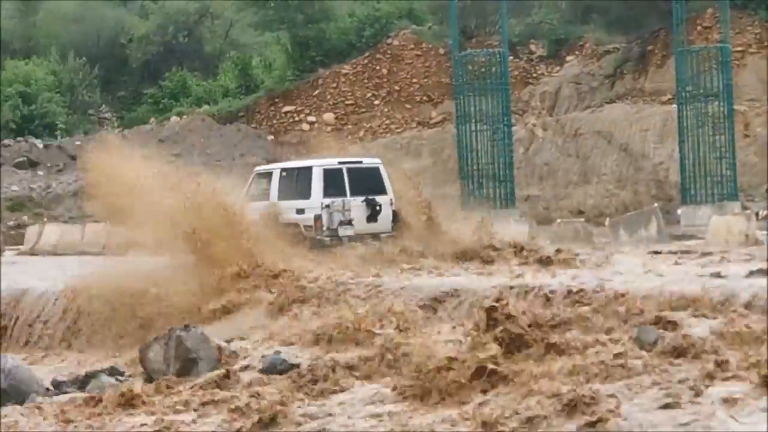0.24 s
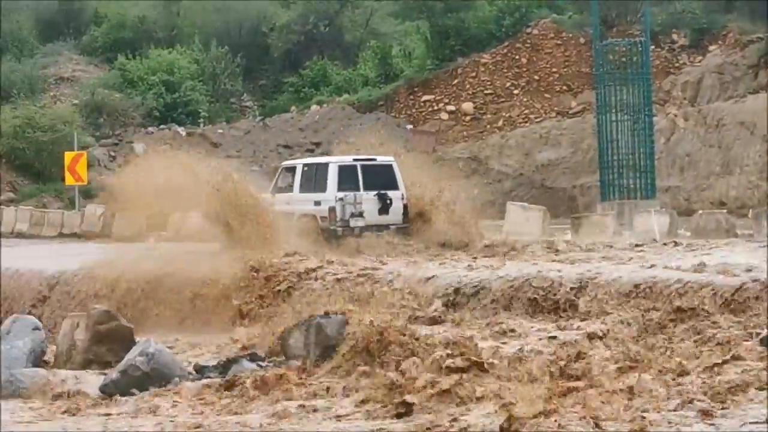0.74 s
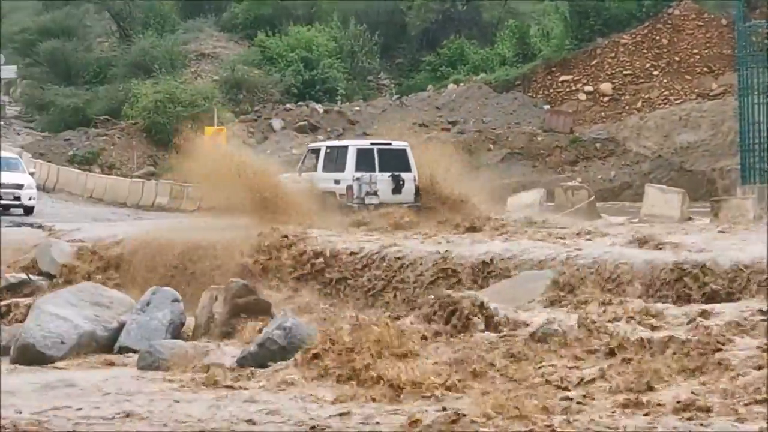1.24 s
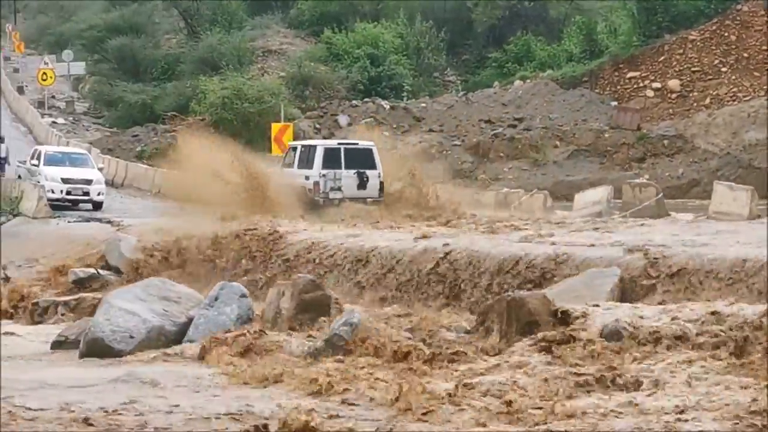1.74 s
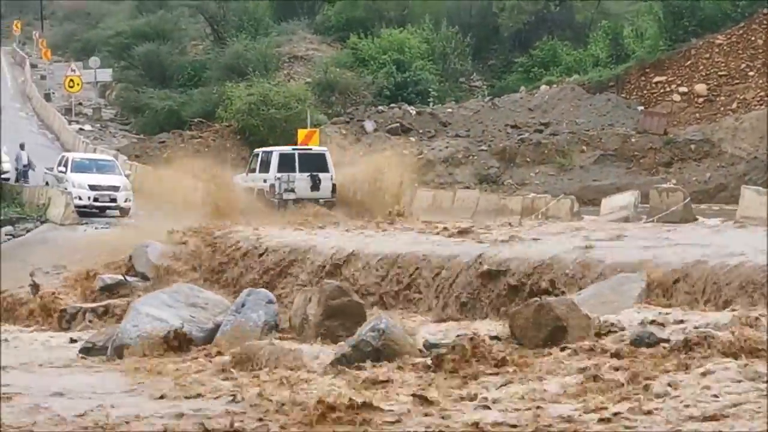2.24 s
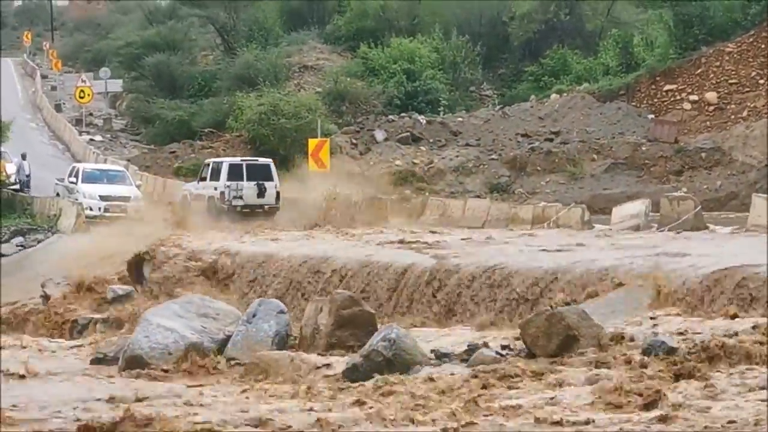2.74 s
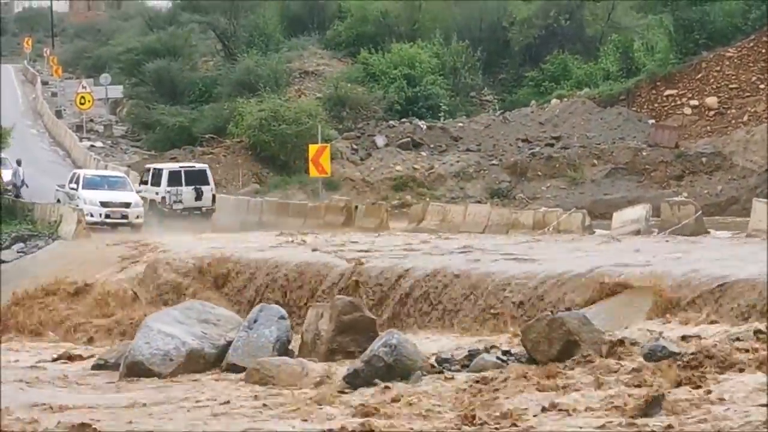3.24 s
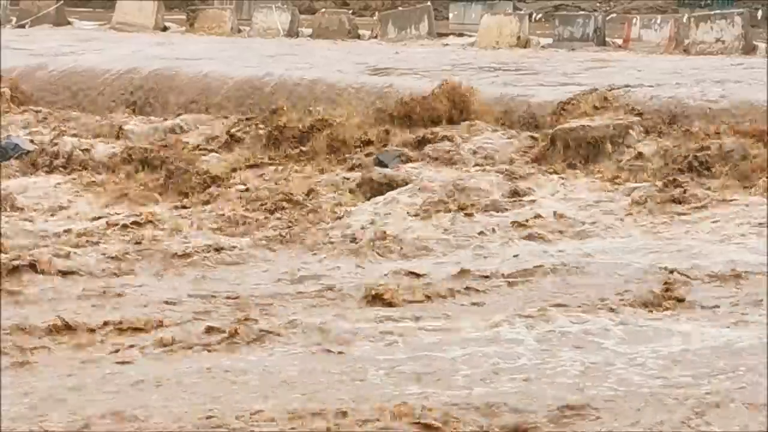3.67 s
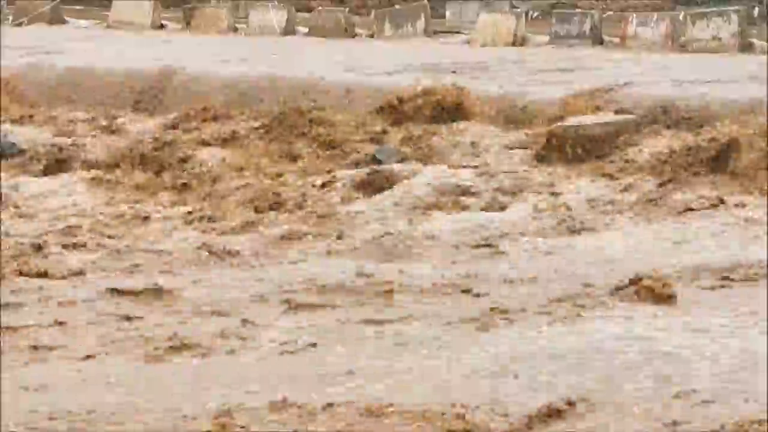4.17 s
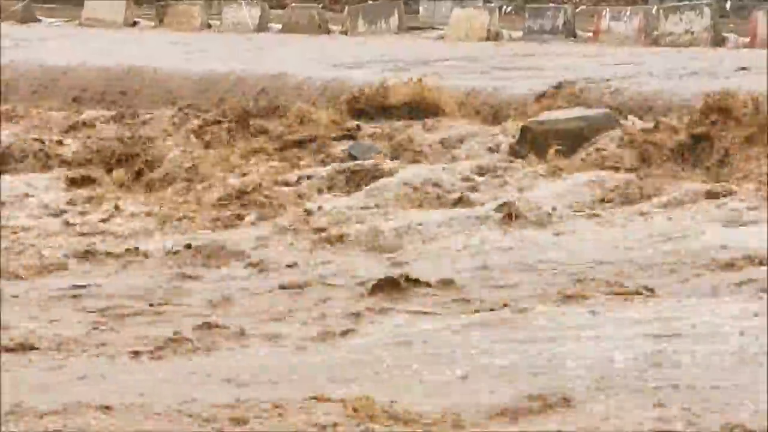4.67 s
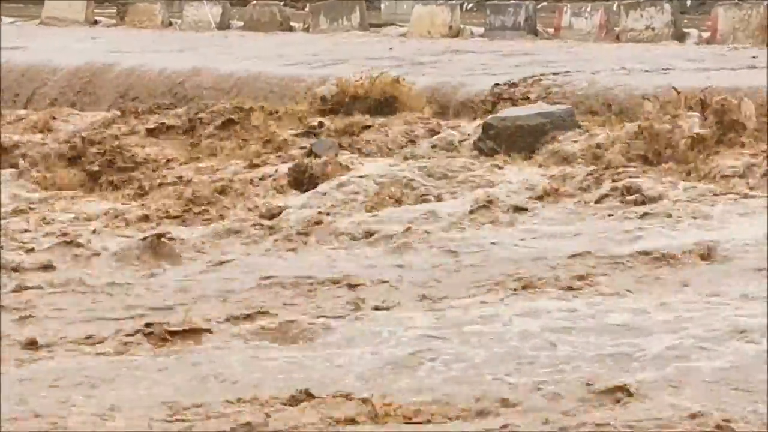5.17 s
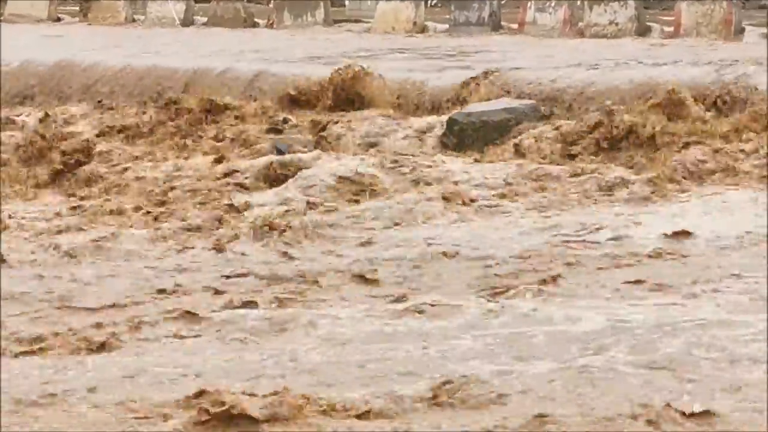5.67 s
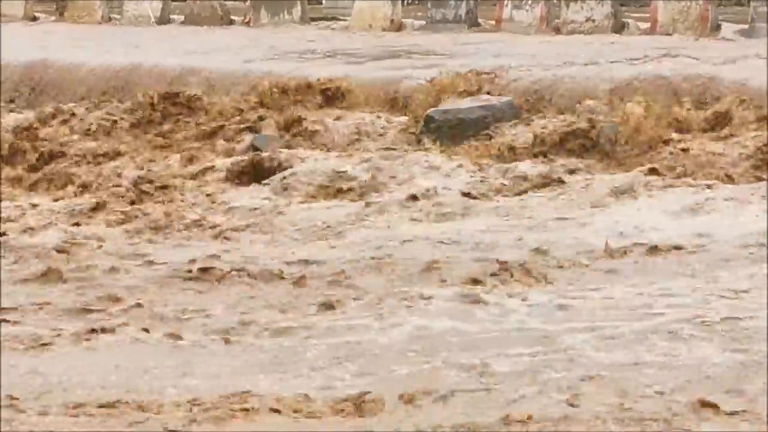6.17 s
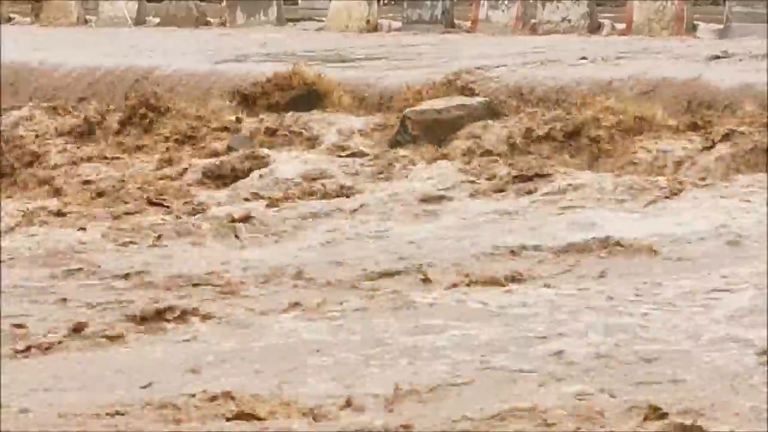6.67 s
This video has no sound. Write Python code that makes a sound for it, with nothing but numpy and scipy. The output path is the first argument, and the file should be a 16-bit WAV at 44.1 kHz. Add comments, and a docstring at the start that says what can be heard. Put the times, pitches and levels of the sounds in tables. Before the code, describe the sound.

From the start, a muddy torrent rushes steadily over a flooded road and boulders: low rumbling air pockets, a thick mid-range roar and constant bright hissing foam and spray. A car pushing through the water strengthens the rumble, easing from about 1.2 s and gone by 3.3 s; no separate engine stands out. Soft low gulps occur near 0.5, 1.1, 1.6 and 2.3 s, with tiny bright drop ticks around 1.9 and 2.5 s. At 3.5 s the sound drops abruptly to near silence, returning suddenly at 3.8 s with a changed tone, facing down at the water. Waves swell gently around 4.5, 5.4 and 6.2 s as rumble slowly builds. A low double gulp comes at 4.3 s, a sharp high spit at 4.8 s, another gulp at 5.6 s. Wide stereo, some distance away; the dull left side becomes quieter after 4.4 s. The flow continues to the end.

```python
"""At a flooded road crossing, muddy water pours over the road and churns between boulders, some way off.
Big trapped air pockets rumble, breaking waves roar, and foam and spray hiss with countless small bubbles.
Seven low gulps and a few near drops stand out; a car fords the water, lifting the rumble, and draws away.
The left microphone port is dull and gets more shaded late on. The sound drops out briefly midway
and returns in another tone, with the microphones pointing down at the water."""
import sys
import numpy as np
from scipy import signal
from scipy.fft import rfft, irfft, next_fast_len
from scipy.io import wavfile
from scipy.ndimage import uniform_filter1d, map_coordinates

SR = 44100
rng = np.random.default_rng(int(sys.argv[2]) if len(sys.argv) > 2 else 0)


def output_pcm(signal):
    """Save a mono or channel-first signal as 16-bit PCM at the path in sys.argv[1].

    Samples are clipped to [-1, 1] before scaling.
    """
    pcm = np.clip(np.atleast_2d(signal).T, -1, 1) * 32767
    wavfile.write(sys.argv[1], SR, np.round(pcm).astype(np.int16))


N = 304731
TIME = np.arange(N) / SR  # s

# relative spectrum of the large air pockets: (frequency [Hz], level [dB])
RUMBLE_SPECTRUM = [(12, -26), (20, -12), (30, -10), (45, -4), (65, -1.5), (120, -1.5), (205, 0.5),
                   (330, -1.25), (420, -8.5), (600, -23), (1200, -62)]
# relative spectrum of the breaking waves: (frequency [Hz], level [dB])
ROAR_SPECTRUM = [(200, -31.5), (380, -7.5), (470, -3.5), (600, -0.3), (730, -0.5), (840, -3), (950, -8.5),
                 (1300, -14.5), (2000, -23.5), (5000, -51)]
# waves that swell over the boulders: (time of crest [s], roar boost [dB])
SURGE_CRESTS = [(1.7, 0.5), (2.7, .5), (3.9, 0.7), (4.45, 1.4), (5.4, 1.5), (6.2, 1.1)]
# relative spectrum of the seething foam: (frequency [Hz], level [dB])
FOAM_SPECTRUM = [(400, -29.5), (900, 0.5), (1400, -2.5), (2300, -0.5), (5500, 1), (7500, -1.5),
                 (9000, -8.5), (14000, -36)]
# relative spectrum of the finest spray: (frequency [Hz], level [dB])
MIST_SPECTRUM = [(4000, -32), (7000, -9), (8500, 0), (11000, -0.5), (16000, 0)]
# extra level of the spray at the start: (time [s], level [dB])
MIST_BOOST = [(0, 2.5), (.4, 1.8), (.72, 2.6), (1, 1.4), (1.6, 0)]
# heavy gulps of trapped air: (onset [s], level [dB], starting pitch [Hz])
GULP_EVENTS = [(.549, -26, 180), (1.129, -30, 315), (1.55, -25, 170), (2.274, -22, 211), (4.28, -22.5, 248),
               (4.3, -24, 205), (5.57, -28, 125)]
# near drops: (onset [s], pitch [Hz], level [dB], 60 dB decay time [s])
DROP_EVENTS = [(1.8785, 5250, -18, .012), (1.887, 5600, -22, .022), (2.512, 15000, -18, .008),
               (4.7893, 10500, -13, .003), (4.7894, 12400, -9, 0.0033), (4.7896, 14900, -6, .003),
               (4.7898, 6400, -14, .004)]
# left-right likeness of roar and foam: (frequency [Hz], likeness [0-1])
LIKENESS = [(300, 0.78), (450, 0.56), (700, 0.73), (850, 0.28), (1000, 0.08), (1600, 0), (3000, 0.02),
            (7000, 0.2)]
# delay of the foam at the left port as the microphones swing: (time [s], delay [samples])
LEFT_LAG = [(0, -12), (.9, -11), (1.5, 0), (2.7, 10), (3.5, 0), (3.75, -14), (6.9, -14)]
# tone of rumble and roar with the microphones pointing down: (frequency [Hz], gain [dB])
FACING_WATER_TONE = [(30, -2), (60, 0), (100, -3.2), (150, 1.2), (240, -0.7), (330, -1.2), (420, 0.2),
                     (530, 1.7), (630, 1.2), (760, -1.4), (900, -3.5), (1100, -0.7), (1400, 1.2), (3000, 6)]
# colour of the left microphone port: (frequency [Hz], gain [dB])
LEFT_PORT_TONE = [(50, 2.5), (280, -0.06), (460, -3), (750, -6), (1200, -4), (1900, -7), (3000, -9.5),
                  (4400, -10.5), (6000, -13.5), (7100, -9), (8500, -18), (10000, -19), (14600, -20.5),
                  (15600, -28)]
# colour of the right microphone port: (frequency [Hz], gain [dB])
RIGHT_PORT_TONE = [(1300, 0), (3000, -1), (4300, .3), (4800, -.5), (6200, 1.4), (6750, 6), (7650, -5.5),
                   (10150, -5), (10650, 1.3), (11700, -2), (13400, -2.7), (13950, -8.8), (14700, -6),
                   (15700, -7.3)]
# small resonances and dips of the right port: (centre [Hz], width [Hz], gain [dB])
RIGHT_PORT_RIPPLE = [(1870, 130, -1.1), (2234, 250, 2.5), (2630, 140, 1), (2950, 120, 2.1),
                     (4100, 150, 0.8), (7860, 220, 1), (8700, 200, -2.5)]
# extra shading of the left port: (frequency [Hz], gain [dB])
LEFT_SHADE_TONE = [(100, -4), (600, -5), (3000, -4), (10000, -5)]

# base levels of the flood's layers (dB)
RUMBLE_DB, ROAR_DB, FOAM_DB, MIST_DB = -35.5, -35, -33, -31
# level changes with the microphones pointing down (dB)
ROAR_DOWN_DB, FOAM_DOWN_DB, MIST_DOWN_DB = -0.23, -0.66, 1
# the rumble is then offset, and builds slowly from the end of the gap
RUMBLE_DOWN_DB, RUMBLE_GROWS_DB_PER_S = -0.5, 0.43
# random heaving of the water: rms depth (dB) and pace (random points per s)
HEAVE_RUMBLE_DB, HEAVE_ROAR_DB, HEAVE_BRIGHT_DB, HEAVE_RATE = .5, .55, 0.08, 10
SURGE_S = 0.29  # time from a wave's crest until its boost falls to 1/e
# the car's share of the rumble (dB), when it starts to fade and when it is gone (s)
WAKE_DB, WAKE_FADES_S, WAKE_GONE_S = 2, 1.2, 3.3
DROP_ATTACK_S = .0003
SHADE_FROM_S, SHADE_TO_S = 4.28, 4.48
GAP_FROM_S, GAP_TO_S = 3.496, 3.7755
TOP_HZ = 15800  # upper end of the band


def amp(db):
    """Turn decibels into gain."""
    return 10 ** (np.asarray(db) / 20)


def unit(x):
    """Scale to rms 1."""
    return x / np.sqrt(np.mean(x ** 2) + 1e-20)


def along(points, hz):
    """Read (frequency, value) points on a log frequency axis."""
    f, v = np.transpose(points)
    return np.interp(np.log(hz + 1), np.log(f + 1), v)


def curve(points):
    """Draw (time, value) points as one value per sample."""
    s, v = np.transpose(points)
    return np.interp(TIME, s, v)


def wobble(rate):
    """Draw a smooth random curve of rms 1 through `rate` random points a second."""
    knots = rng.standard_normal(int(N * rate / SR) + 4)
    return unit(map_coordinates(knots, [TIME * rate]))


def filtered(x, response):
    """Multiply the spectrum of x by a response of frequency."""
    m = next_fast_len(N + SR // 2)
    hz = np.fft.rfftfreq(m, 1 / SR)
    return irfft(rfft(x, m) * response(hz), m)[..., :N]


def coloured(x, spectrum):
    """Shape x by (frequency, dB) points."""
    return filtered(x, lambda hz: amp(along(spectrum, hz)))


def churn(patchy_db):
    """Two unrelated noises, patchy in time and pitch alike: bubbles too many to tell apart."""
    z = signal.stft(rng.standard_normal((2, N)), nperseg=512)[2]
    patches = uniform_filter1d(rng.standard_normal(z.shape[1:]), size=12, axis=0)  # across pitch
    patches = uniform_filter1d(patches, size=8, axis=1)  # across time
    noise = signal.istft(z * amp(patchy_db * unit(patches)), nperseg=512)[1]
    return unit(noise[:, :N])


def bubbles(rate, low_hz, high_hz, cycles, scatter_db, size):
    """Random bubbles (rate per s), each ringing for a few cycles and rising in pitch near the surface."""
    when, pitch, strength = rng.random((int(rate * N / SR), 3)).T
    hz = low_hz + (high_hz - low_hz) * pitch
    turns = hz[:, None] * np.arange(size) / SR
    age = np.minimum(turns / cycles, 2)
    gain = amp(-scatter_db * np.log(1 - .995 * strength)) * np.sqrt(hz)  # a few are far louder
    tones = np.sin(2 * np.pi * turns * (1 + age / 20))
    rings = gain[:, None] * np.exp(-np.pi * age) * tones
    at = (when * N).astype(int)[:, None] + np.arange(size)
    return unit(np.bincount(at.ravel(), rings.ravel(), N)[:N])


def bubble_pair(**settings):
    """Two unrelated streams of bubbles."""
    return np.array([bubbles(**settings) for _ in range(2)])


def spread(pair, likeness):
    """Mix two unrelated signals into left and right of a given likeness per frequency."""
    def mid_side_gains(hz):
        turn = np.arccos(np.clip(likeness(hz), -1, 1)) / 2
        return np.array([np.cos(turn), np.sin(turn)])

    mid, side = filtered(pair, mid_side_gains)
    return np.array([mid + side, mid - side])


def rumble():
    """Large air pockets gulp under the fall; waves this long reach both ports much alike."""
    pockets = bubbles(rate=70, low_hz=71.0, high_hz=406, cycles=6.0, scatter_db=1.5, size=3000)
    mass = spread(churn(patchy_db=0.68), lambda hz: along([(200, .96), (400, 0.86)], hz))
    mass = unit(coloured(mass, RUMBLE_SPECTRUM))
    return unit(mass + amp(-7.5) * unit(coloured(pockets, RUMBLE_SPECTRUM)))


def roar():
    """Waves break on the boulders and fold in clouds of middling bubbles."""
    glugs = bubble_pair(rate=160, low_hz=384, high_hz=1296, cycles=6.7, scatter_db=2.0, size=900)
    water = unit(coloured(churn(patchy_db=0.5), ROAR_SPECTRUM))
    water = water + amp(-7) * unit(coloured(glugs, ROAR_SPECTRUM))
    return unit(spread(water, lambda hz: along(LIKENESS, hz)))


def surges_db():
    """Passing waves lift the roar (dB), each swelling and ebbing alike."""
    return sum(db * np.exp(-((TIME - s) / SURGE_S) ** 2) for s, db in SURGE_CRESTS)


def foam():
    """Small bubbles seethe all over the surface; a little reaches both ports, at slightly different times."""
    fizz = bubble_pair(rate=600, low_hz=1290, high_hz=7510, cycles=12.7, scatter_db=2, size=360)
    water = unit(coloured(churn(patchy_db=0.63), FOAM_SPECTRUM))
    water = water + amp(-7.5) * unit(coloured(fizz, FOAM_SPECTRUM))
    left, right = spread(water, lambda hz: along(LIKENESS, hz))
    left = map_coordinates(left, [np.arange(N) - curve(LEFT_LAG)])
    flicker_db = 0.14 * wobble(25) + 0.3 * wobble(140)
    return unit(np.array([left, right]) * amp(flicker_db))


def mist():
    """The finest spray crackles as it falls back, unrelated at the two ports but for its flicker."""
    crackle = bubble_pair(rate=1800, low_hz=6960, high_hz=15000, cycles=7, scatter_db=3.0, size=60)
    water = unit(coloured(churn(patchy_db=0.65), MIST_SPECTRUM))
    water = water + amp(-13.0) * unit(coloured(crackle, MIST_SPECTRUM))
    flicker_db = 0.2 * wobble(25) + 0.31 * wobble(140)
    return unit(water * amp(flicker_db))


def gulps(t60=0.14, swell=0.0058):
    """The biggest air pockets ring low and rise a little in pitch; decay and swell in s."""
    out, t = np.zeros(N + SR), np.arange(SR // 4) / SR
    for s, db, hz in GULP_EVENTS:
        ring = np.sin(2 * np.pi * (hz * t * (1 + t / 2) + rng.random()))
        envelope = amp(db - 60 * t / t60) * (1 - np.exp(-t / swell))
        out[round(s * SR):][:len(t)] += envelope * ring
    return out[:N]


def drops():
    """Near drops spit, each a brief ring made slightly ragged by a random walk in phase."""
    out, t = np.zeros(N + SR), np.arange(SR // 20) / SR
    for s, hz, db, t60 in DROP_EVENTS:
        ragged = 0.0305 * np.cumsum(rng.standard_normal(len(t)))
        envelope = amp(db - 60 * t / t60) * (1 - np.exp(-t / DROP_ATTACK_S))
        out[round(s * SR):][:len(t)] += envelope * np.sin(2 * np.pi * hz * t + ragged)
    return out[:N]


def car_wake_db():
    """The car ploughing through the ford lifts the rumble (dB), less and less as it draws away."""
    return np.interp(TIME, [WAKE_FADES_S, WAKE_GONE_S], [WAKE_DB, 0])


def scene():
    """Layer the heaving water with the car's wake, waves, gulps and drops."""
    down = TIME > GAP_FROM_S + .1  # the microphones turn to the water inside the gap
    build_db = down * (RUMBLE_DOWN_DB + RUMBLE_GROWS_DB_PER_S * (TIME - GAP_TO_S))
    rumble_db = RUMBLE_DB + car_wake_db() + build_db + HEAVE_RUMBLE_DB * wobble(HEAVE_RATE)
    roar_db = ROAR_DB + ROAR_DOWN_DB * down + surges_db() + HEAVE_ROAR_DB * wobble(HEAVE_RATE)
    foam_db = FOAM_DB + FOAM_DOWN_DB * down
    mist_db = MIST_DB + MIST_DOWN_DB * down + curve(MIST_BOOST)

    deep = amp(rumble_db) * rumble() + amp(roar_db) * roar()
    deep = np.where(down, coloured(deep, FACING_WATER_TONE), deep)
    bright = amp(foam_db) * foam() + amp(mist_db) * mist()
    bright = amp(HEAVE_BRIGHT_DB * wobble(HEAVE_RATE)) * bright
    return deep + bright + gulps() + drops()


def right_ripple(hz):
    """Gain of the right port's narrow bumps and dips."""
    bumps = [db * np.exp(-((hz - centre) / width) ** 2) for centre, width, db in RIGHT_PORT_RIPPLE]
    return amp(sum(bumps))


def record(dry):
    """Colour each port, shade the left one, drop the sound out for the gap and end the band."""
    left, right = coloured(dry[0], LEFT_PORT_TONE), coloured(dry[1], RIGHT_PORT_TONE)
    right = filtered(right, right_ripple)
    shaded = np.interp(TIME, [SHADE_FROM_S, SHADE_TO_S], [0, 1])
    left = (1 - shaded) * left + shaded * coloured(left, LEFT_SHADE_TONE)
    # the gap opens with a steep drop and a faint, quick fade
    fade = amp(-16.5 - 60 * np.abs(TIME - GAP_FROM_S) / 0.047)
    running = np.where((TIME < GAP_FROM_S) | (TIME > GAP_TO_S), 1, fade)
    return filtered(np.array([left, right]) * running, lambda hz: np.clip((TOP_HZ - hz) / 100, 0, 1))


dry = scene()
out = record(dry)
output_pcm(out)
```